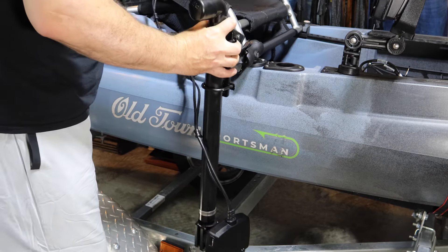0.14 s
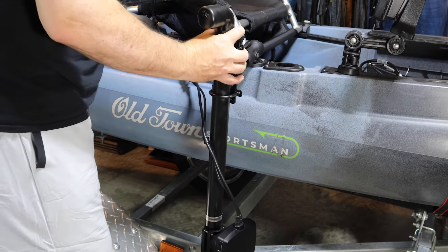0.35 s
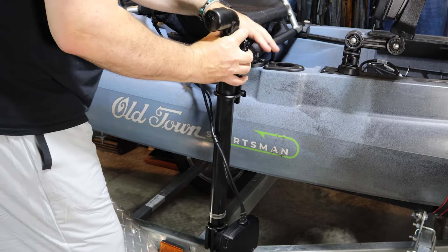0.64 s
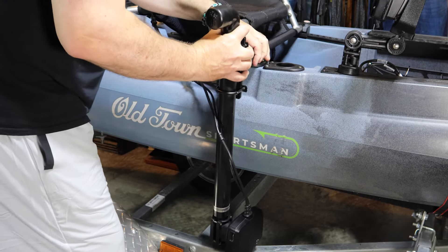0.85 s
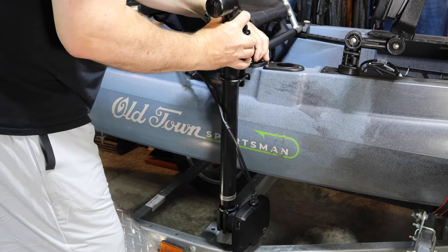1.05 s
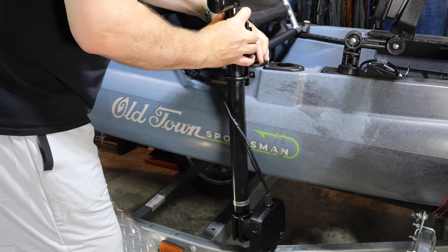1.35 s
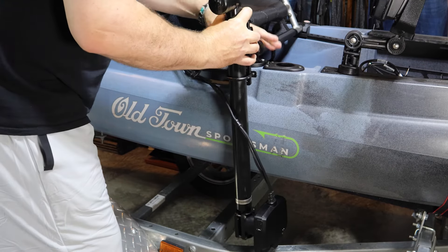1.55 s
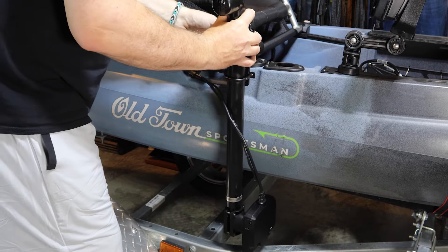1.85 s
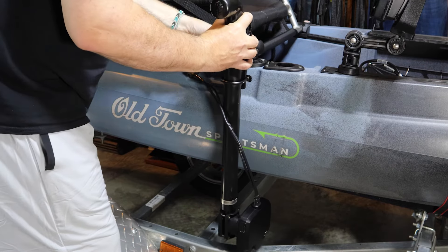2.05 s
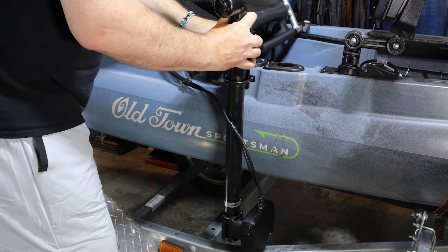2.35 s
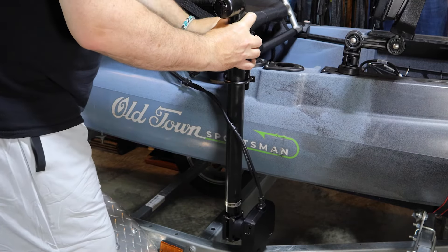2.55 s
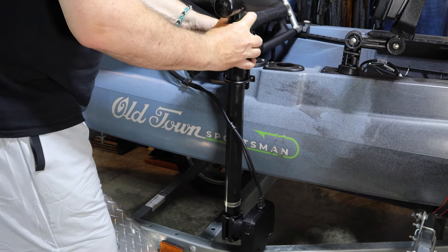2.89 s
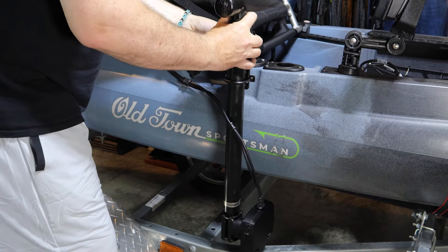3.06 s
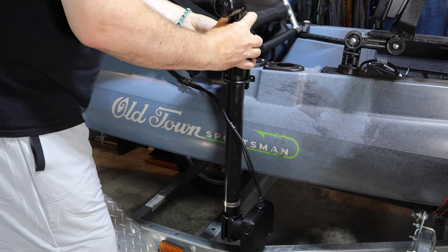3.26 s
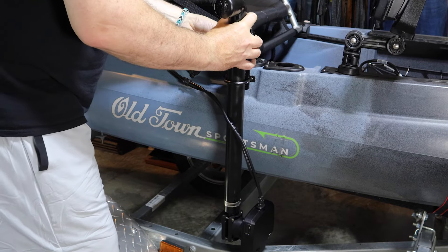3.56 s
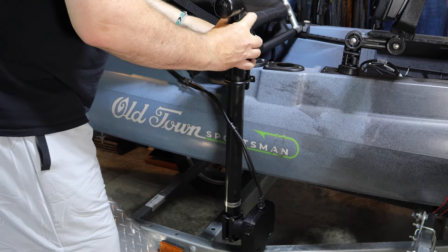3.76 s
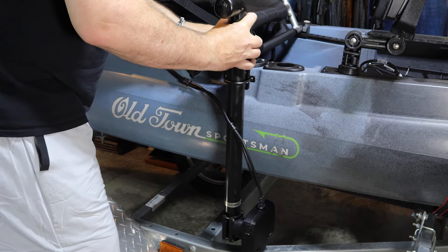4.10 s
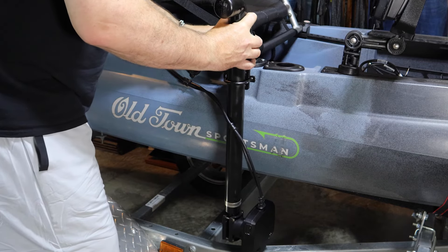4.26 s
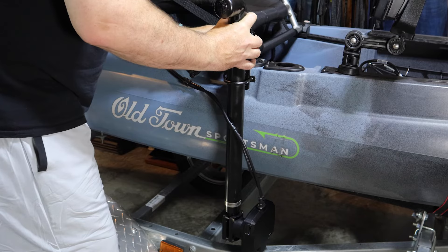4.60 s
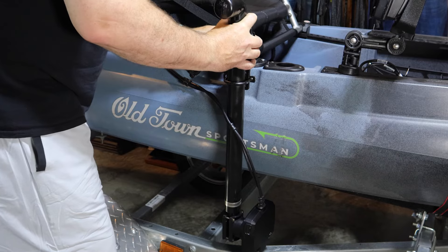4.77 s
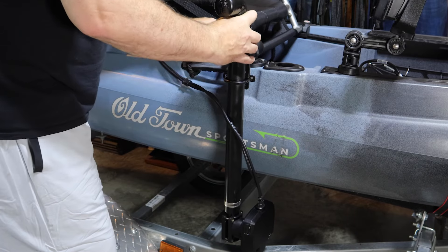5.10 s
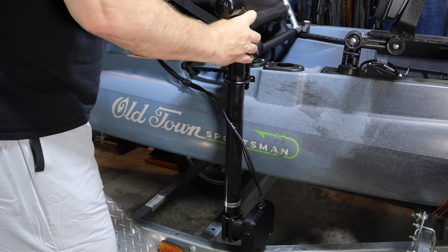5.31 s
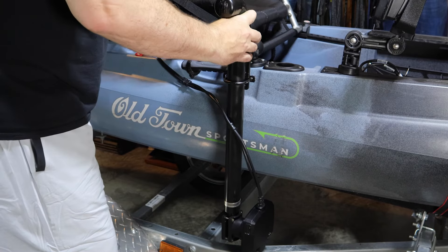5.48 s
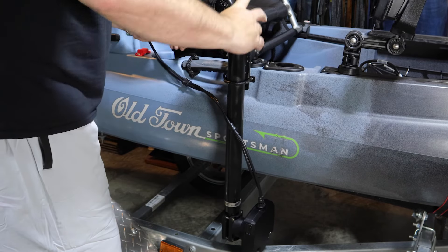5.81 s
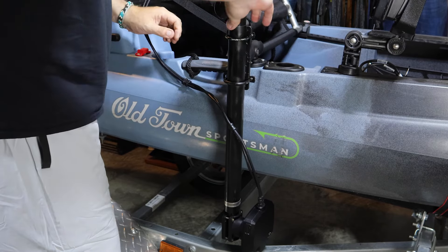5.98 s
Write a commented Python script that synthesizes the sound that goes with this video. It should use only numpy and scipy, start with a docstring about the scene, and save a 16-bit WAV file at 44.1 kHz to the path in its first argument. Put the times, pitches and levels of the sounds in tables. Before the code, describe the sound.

A hollow plastic pole knocks and ticks lightly against a kayak and its mount during the first second or so, each bump ringing softly in the hull. At about 1.4 seconds it scrapes into its seat with a loud clunk and a low boom. Softer, uneven knocks continue to about 3.5 seconds, with a click from a plastic clamp near 2.5 and a sharper one near 3.6, each followed by a faint, thin squeak. Around 4 seconds the clamp gives a brief, wavering squeal, then five loud, sharp clicks in quick succession until 4.6, with short squeaks among them. A few faint knocks follow from 5 to 5.8 seconds. Hands rub faintly over a low, steady background rush. The garage adds a short echo. The sound sits on the left, with only the bass reaching both sides.

```python
"""A plastic clamp snaps tight in sharp clicks, fixing a hollow pole to a kayak in a garage.
First the pole knocks and clunks into its mount, and each blow makes the hull boom. Then the clamp
squeaks under load as its plastic sticks and slips, and clicks each time it slips a notch.
Hands rub faintly, and the close walls add a short echo.
One microphone feeds the left channel; only the bass spreads to both sides."""
import sys
import numpy as np
from scipy import signal
from scipy.fft import rfft, irfft
from scipy.io import wavfile
from scipy.ndimage import uniform_filter1d

SR = 44100
rng = np.random.default_rng(int(sys.argv[2]) if len(sys.argv) > 2 else 0)


def to_wav(s):
    """Save 16-bit WAV."""
    ch = np.atleast_2d(s).T  # columns
    pcm = np.round(np.clip(ch, -1, 1) * 32767)  # PCM
    wavfile.write(sys.argv[1], SR, pcm.astype(np.int16))


N = 270950
SIZE = 8192  # samples in one short sound
HZ = np.arange(SIZE // 2 + 1) * SR / SIZE + 1e-3  # frequencies of a short sound
SCENE_HZ = np.fft.rfftfreq(N, 1 / SR)  # frequencies of a full-length sound
SEATING_S = 1.45  # when the pole lands in its seat


def undb(db):
    """Turn decibels into a gain to multiply by."""
    return 10 ** (np.asarray(db) / 20)


def along(points, hz):
    """Read a value between (frequency, value) points, with octaves evenly spaced."""
    f, value = np.transpose(points)
    return np.interp(np.log(np.maximum(hz, 1)), np.log(f), value)


def noise(colour, samples):
    """Noise of average (rms) strength 1; its colour says how strong each frequency is."""
    gains = undb(along(colour, np.fft.rfftfreq(samples, 1 / SR)))
    x = irfft(rfft(rng.standard_normal(samples)) * gains, samples)
    return x / x.std()


def fade(t, t60):
    """A fade that falls by 60 dB in t60 seconds, the ring time."""
    return np.exp(-np.log(1000) * t / t60)


def burst(t60):
    """The spectrum of a dying puff of noise with energy 1."""
    x = rng.standard_normal(SIZE) * fade(np.arange(SIZE) / SR, t60)
    return rfft(x / np.linalg.norm(x))


def resonance(hz, width_hz, f=HZ):
    """A ringing part passes its own pitch fully and others less."""
    return 1j * f * width_hz / (hz ** 2 - f ** 2 + 1j * f * width_hz)


def damped(modes):
    """Plastic stops ringing fast, so each of its resonances is made at least 500 Hz wide."""
    return sum(undb(db) * resonance(hz, max(width, 500)) for hz, width, db in modes)


def soft(hz):
    """A soft contact passes little above this frequency."""
    return 1 / (1 + (1j * HZ / hz) ** 2 + 1j * HZ / hz)


def bend(spectrum, cycles, knee_hz):
    """Turn a spectrum into a bending wave in plastic: the lows arrive after the highs."""
    return irfft(spectrum * np.exp(-2j * np.pi * cycles * np.log(1 + HZ / knee_hz)))


def loudest(x, db):
    """Scale a sound so that its loudest 4 ms have this level."""
    return x * undb(db) / np.sqrt(uniform_filter1d(x ** 2, size=176).max())


def unsteady(rate_hz):
    """A smooth random wander, mostly between -1 and 1."""
    knots = rng.standard_normal(1000)
    return np.interp(np.arange(N) / SR * rate_hz, np.arange(len(knots)), knots)


def movement(s, length_s, attack_s, release_s):
    """The gain of one movement: it swells, holds and dies away."""
    t = np.arange(N) / SR - s
    return np.clip(t / attack_s, 0, 1) * np.exp(-np.maximum(t - length_s, 0) / release_s)


def add(bus, s, sound, room_db):
    """Put a sound on a bus of two tracks: one is heard directly, one feeds the room."""
    i = max(int(s * SR), 0)
    part = sound[:N - i]
    bus[:, i:i + len(part)] += np.outer([1, undb(room_db)], part)


# the colour of the background noise: (frequency [Hz], relative level [dB])
AIR_COLOUR = [(15, -35), (25, -25.5), (64, 1), (114, -6), (141, -4), (677, -10), (734, -16), (818, -10.5),
              (1100, -16), (1260, -13.5), (1840, -19), (14800, -32.5), (16000, -59)]


def air(level_db=-59):
    """The quiet garage has a steady, low rush."""
    return noise(AIR_COLOUR, N) * undb(level_db)


# how long the garage rings: (frequency [Hz], ring time [s])
ECHO_TIMES = [(80, 0.68), (300, 0.31), (1000, 0.42), (2500, 0.52), (6000, 0.37), (15000, 0.37)]
# the colour of its echo: (frequency [Hz], relative level [dB])
ECHO_COLOUR = [(60, 16), (150, 8.5), (350, -2), (600, -4.5), (900, -11.5), (1300, -7), (2000, -9),
               (2550, 1), (3300, -2), (4500, -8), (6500, -2), (10000, -5.5), (15000, 0.5)]


def garage(x, echo_db=-2, first_s=0.012, build_s=0.00067):
    """Sound bounces between close walls, and each band of pitches dies at its own pace."""
    t = np.arange(SR) / SR
    f = np.fft.rfftfreq(SR, 1 / SR)
    reflections = rfft(rng.standard_normal(SR)) * undb(along(ECHO_COLOUR, f))
    onset = 1 - np.exp(-np.maximum(t - first_s, 0) / build_s)
    edges = np.geomspace(20, SR / 2, 16)
    tail = 0
    for lo, hi in zip(edges, edges[1:]):
        decay = onset * fade(t, along(ECHO_TIMES, np.sqrt(lo * hi)))
        band = irfft(reflections * (f >= lo) * (f < hi), SR)
        tail = tail + band * decay / np.linalg.norm(decay)
    return undb(echo_db) * signal.fftconvolve(x, tail)[:N]


# the hands shift the pole and its cable: (time [s], length [s], level [dB])
HAND_MOVES = [(0, 0.34, -57.5), (0.98, 0.71, -59.5), (2.071, 0.034, -57), (2.465, 0.34, -60),
              (3.08, 0.48, -67), (3.58, 1.12, -58.5), (5.077, 0.19, -61.5), (5.507, 0.54, -62)]


def effort(resting_db=-73.5, attack_s=0.0083, release_s=0.058):
    """How strongly the hands rub, as a gain; every move swells and fades alike."""
    moves = sum(undb(db) * movement(s, length, attack_s, release_s) for s, length, db in HAND_MOVES)
    return undb(resting_db) + moves


# the colour of the rubbing: (frequency [Hz], relative level [dB])
RUB_COLOUR = [(40, -26), (90, -7), (200, 1), (350, 3.5), (800, -4.5), (1600, -9.5), (3000, -19),
              (5000, -18), (12000, -34)]


def rubbing(slips_per_s=900, grain_db=3, grip_db=3):
    """Tiny uneven slips under the hands blur into a shuffle."""
    slips = (rng.random(N) < slips_per_s / SR) * rng.standard_normal(N)
    slips *= undb(grain_db * np.minimum(rng.exponential(size=N), 2))
    slips *= undb(grip_db * unsteady(45))
    shuffle = irfft(rfft(slips) * undb(along(RUB_COLOUR, SCENE_HZ)), N)
    return shuffle / shuffle.std() * effort()


def thread(start_s=3.4, length_s=0.56, hz=1610, start_db=-65, rise_db=9, halting_db=4):
    """The clamp's screw thread sings a faint, halting note, louder as it tightens."""
    note = irfft(rfft(rng.standard_normal(N)) * resonance(hz, 140, SCENE_HZ) ** 2, N)
    note *= undb(halting_db * unsteady(35))
    tightness = np.clip((np.arange(N) / SR - start_s) / length_s, 0, 1)
    turning = movement(start_s, length_s, attack_s=0.0055, release_s=0.046)
    return note / note.std() * undb(start_db + rise_db * tightness) * turning


# cable and fingers touch the shell: (time [s], level [dB])
LIGHT_TOUCHES = [(0.018, -55), (0.091, -56.5), (0.104, -58), (0.25, -47), (0.262, -46.5), (2.194, -65),
                 (3.06, -52.5), (5.124, -53.5), (5.771, -56.5)]


def ticks(hz=5500, width_hz=6000):
    """A light, hard touch gives a bright tick with no body."""
    bus = np.zeros((2, N))
    for s, db in LIGHT_TOUCHES:
        tick = irfft(burst(t60=0.022) * resonance(hz, width_hz) ** 2)
        add(bus, s, loudest(tick, db), room_db=-2)
    return bus


# the strong notes of the hull panels: (pitch [Hz], relative level [dB], ring time [s])
HULL_NOTES = [(60, -7, .25), (95, 0, .24), (130, -5, .2), (165, -7, .18), (207, -1, .26), (255, -10, .18),
              (305, -3, .2), (345, 3, .3), (400, -1, .22), (440, 0, .25), (522, -6, .3), (592, -5, .3),
              (678, -7, .28), (852, -8, .28), (940, -8, .23)]
# the many weaker notes, blurred into a wash: (frequency [Hz], relative level [dB])
WASH_COLOUR = [(35, -39), (70, -40), (130, 7), (240, 5.5), (380, 7.5), (550, -7.5), (900, -9.5),
               (1500, -13.5), (2600, -39)]


def boom(rise_s, wash_db, wash_t60):
    """The hull swells and rings, its notes a little out of tune in a new way with each blow."""
    t = np.arange(2 * SIZE) / SR
    hz, db, t60 = np.transpose(HULL_NOTES)[:, :, None]
    detune, phase = rng.standard_normal((2, len(HULL_NOTES), 1))
    pitch = hz * (1 + 0.0097 * detune)
    rings = undb(db) * fade(t, t60) * np.sin(2 * np.pi * (pitch * t + phase))
    wash = undb(wash_db) * noise(WASH_COLOUR, len(t)) * fade(t, wash_t60)
    return (rings.sum(axis=0) + wash) * (1 - np.exp(-t / rise_s))


def heave(level_db=-30.5, hz=91, sway_hz=58, sway_db=-7, rise_s=0.0089):
    """Under the full weight of the pole, the hull swings at its two deepest notes."""
    t = np.arange(2 * SIZE) / SR
    swing = np.sin(2 * np.pi * hz * t) + undb(sway_db) * np.sin(2 * np.pi * sway_hz * t)
    swing *= (1 - np.exp(-t / rise_s)) * fade(t, t60=0.27)
    bus = np.zeros((2, N))
    add(bus, SEATING_S, loudest(swing, level_db), room_db=-30)
    return bus


def chatter(gain_db=-36, hz=1000, width_hz=800, contacts_per_s=700, lead_s=0.037, grain_db=4):
    """The pole scrapes down into its seat and chatters there until it settles."""
    contacts = (rng.random(N) < contacts_per_s / SR) * undb(grain_db * rng.standard_normal(N))
    scrape = irfft(rfft(contacts) * resonance(hz, width_hz, SCENE_HZ) ** 2, N)
    settling = movement(SEATING_S - lead_s, 0.0069, attack_s=0.024, release_s=0.085)
    bus = np.zeros((2, N))
    add(bus, 0, scrape / scrape.std() * undb(gain_db) * settling, room_db=-2)
    return bus


def jiggles(count=12, scatter_db=2, hz=750, hardness_db=-3, hull_db=-7):
    """Extra rows for POLE_KNOCKS: faint chance knocks of the loose pole, louder with busy hands."""
    at = ((np.arange(count) + rng.random(count)) / count * N).astype(int)
    levels = 20 * np.log10(effort()[at]) + scatter_db * rng.standard_normal(count)
    return [(i / SR, db, hz, hardness_db, hull_db) for i, db in zip(at, levels)]


# the pole hits mount and hull; hardness and boom adjust the base level for their parts of the sound:
# (time [s], base level [dB], pitch [Hz], hardness [dB], hull boom [dB])
POLE_KNOCKS = [(0.017, -56, 980, 12, 4), (0.175, -39, 624, -2.5, 0), (0.244, -58.5, 600, 8.5, 7),
               (0.286, -41, 650, -4, -14), (0.85, -41.5, 1000, 2, 3.5), (0.892, -42.5, 744, -0.5, 7),
               (0.933, -35.5, 640, -9, 3.5), (0.966, -47, 635, -11, 13), (1.154, -38.5, 690, -2, 5),
               (1.417, -38, 940, -4, -7), (1.425, -24, 880, -15, 0.5), (1.435, -19.5, 595, -14, -1),
               (1.468, -48, 794, -13, 14), (1.595, -48.5, 586, -4, 8), (1.66, -43.5, 550, -5.5, 3),
               (2.121, -54, 680, -17, 9), (2.19, -41.5, 674, -3.5, -23), (2.472, -50, 850, -27, -2.5),
               (2.524, -48.5, 654, -14, 3.5), (2.625, -38.5, 670, -21, -11), (2.754, -55.5, 826, 3, -7),
               (2.782, -44.5, 685, -5.5, -1.5), (2.841, -44, 870, -6.5, -12), (3.009, -45.5, 590, -19, 4),
               (3.064, -47.5, 815, -6, -2), (3.16, -49.5, 870, -9, -6.5), (3.267, -49.5, 715, -7, 5),
               (3.324, -44, 700, -28, -18), (3.446, -49.5, 725, -6, 2), (5.065, -49, 860, -1, -10),
               (5.084, -43.5, 890, -4, -1.5), (5.199, -55, 634, 2.5, 5.5), (5.324, -47, 740, -1.5, -2),
               (5.484, -52, 613, -11, 3.5), (5.635, -44.5, 490, -20, 3.5)]


def knocks(clack_hz=1650, thud_hz=430, room_db=1):
    """A blow clacks through the pole, rattles the mount, thuds into the deck and wakes the hull."""
    bus = np.zeros((2, N))
    for s, db, hz, hard_db, hull_db in POLE_KNOCKS + jiggles():
        # 1 + burst is one clean hit plus its rattle
        clack = irfft(resonance(clack_hz, 1350) ** 2 * soft(1790) ** 2 * (1 + burst(0.046)))
        knock = resonance(hz, 0.98 * hz) ** 2 * soft(1.45 * hz) ** 2 * (1 + burst(0.049))
        knock = bend(knock, cycles=1.235, knee_hz=153.6)
        thud = resonance(thud_hz, 450) ** 2 * soft(490) ** 2 * (1 + burst(0.07))
        thud = bend(thud, cycles=1.626, knee_hz=118.2)
        tick = irfft(burst(0.034) * resonance(4240, 1400) * resonance(5500, 9100))
        hull = boom(rise_s=0.0044, wash_db=3.5, wash_t60=0.46)
        add(bus, s, loudest(clack, db + hard_db + 2), room_db)
        add(bus, s, loudest(tick, db + 0.92 * hard_db - 13), room_db)  # hard contacts tick more
        add(bus, s, loudest(knock, db + 3), room_db)
        add(bus, s, loudest(thud, db + hull_db - 1), room_db - 2.5)
        add(bus, s + 0.00618, loudest(hull, db + hull_db - 2.5), room_db=-14)
    return bus


def stick_slip(hz, gain, second_db=-19, third_db=-32, waver=0.012, rough_db=3):
    """Plastic sticks and slips at an unsteady rate and with uneven force, making a rough tone."""
    pace, force = uniform_filter1d(rng.standard_normal((2, SIZE)), size=100)[:, :len(hz)] * 10
    pitch = hz * (1 + waver * pace)
    phase = 2 * np.pi * np.cumsum(pitch) / SR
    overtones = undb(second_db) * np.sin(2 * phase) + undb(third_db) * np.sin(3 * phase)
    edge_db = along([(1000, 8), (1400, -3), (5000, 7), (6200, -10)], pitch)  # how jerky the slip is
    tone = np.sin(phase) + undb(edge_db) * overtones
    return np.sqrt(2) * tone * gain * undb(rough_db * force)


# the clamp's short squeaks: (time [s], length [s], first pitch [Hz], last pitch [Hz], level [dB])
CLAMP_SQUEAKS = [(0.1, 0.0062, 2490, 3120, -50.5), (2.238, 0.011, 2030, 1890, -59),
                 (2.63, 0.03, 6670, 5700, -44), (3.406, 0.012, 1610, 1600, -50.5),
                 (3.728, 0.048, 5180, 3910, -43.5), (3.838, 0.022, 4050, 3760, -54),
                 (3.998, 0.026, 1247, 1870, -36), (4.334, 0.0167, 1376, 810, -27.5),
                 (4.442, 0.021, 1723, 930, -28.5), (4.604, 0.019, 1494, 980, -30.5)]


def squeaks(room_db=-2, ring_hz=5000, ring_db=6):
    """Each squeak swells and fades while its pitch glides ever faster."""
    bus = np.zeros((2, N))
    for s, length, first_hz, last_hz, db in CLAMP_SQUEAKS:
        progress = np.linspace(0, 1, int(length * SR))
        pitch = first_hz + (last_hz - first_hz) * progress ** 1.8
        swell = np.abs(np.sin(np.pi * progress ** 0.87)) ** 0.7
        # a squeak carries further near the pitch at which the clamp's edge rings
        carry_db = room_db + ring_db * abs(resonance(ring_hz, 400, first_hz))
        add(bus, s, stick_slip(pitch, undb(db) * swell), carry_db)
    return bus


# points along one longer squeal: (time [s], pitch [Hz], level [dB])
SQUEAL_PATH = [(4.026, 1334, -48), (4.035, 1043, -38), (4.042, 985, -31.5), (4.05, 1212, -28),
               (4.056, 1483, -32), (4.077, 1360, -27.5), (4.086, 1520, -35), (4.093, 1277, -25),
               (4.101, 970, -38)]


def squeal():
    """Just before the clamp gives way, it squeals and wavers with the load."""
    s, hz, db = np.transpose(SQUEAL_PATH)
    t = np.arange(s[0], s[-1], 1 / SR)
    bus = np.zeros((2, N))
    add(bus, s[0], stick_slip(np.interp(t, s, hz), undb(np.interp(t, s, db))), room_db=-2)
    return bus


# how the clamp's body and hard edges ring: (pitch [Hz], width before damping [Hz], relative level [dB])
BODY_NOTES = [(1050, 1270, 35.5), (1760, 240, 31), (2410, 360, -24)]
EDGE_NOTES = [(3840, 7200, -2.5), (5080, 310, 12.5), (6070, 270, -2), (9900, 730, -2)]
# the clamp slips a notch; boom and sizzle adjust the base level for their parts of the sound:
# (time [s], base level [dB], flexing pitch [Hz], hull boom [dB], sizzle [dB])
CLAMP_SLIPS = [(2.55, -28, 1390, -4.5, -33), (3.632, -21.5, 1720, -12.5, -11),
               (4.114, -25, 1210, -23.5, -26), (4.212, -18.5, 1200, -21.5, -25),
               (4.31, -18, 1180, -21, -24), (4.432, -17.5, 1170, -19, -29),
               (4.575, -15.5, 1270, -15.5, -25)]


def clicks(crack_hz=3800, hollow_hz=3150, rebound_s=0.000979):
    """With each slip the hard edges snap, then the clamp flexes twice, a millisecond apart."""
    bus = np.zeros((2, N))
    hollow = 1 - resonance(hollow_hz, 400)  # a quiet gap between the notes of body and edges
    body = damped(BODY_NOTES) * hollow * soft(2500)
    edges = damped(EDGE_NOTES) * hollow * resonance(3100, 3500) * resonance(6900, 8000)
    rebound = 0.94 * np.exp(-2j * np.pi * HZ * rebound_s)  # the second flex, a delayed copy
    strongest_db = max(row[1] for row in CLAMP_SLIPS)
    for s, db, hz, hull_db, sizzle_db in CLAMP_SLIPS:
        room_db = 3.5 + 0.21 * hull_db  # the more the hull takes part, the more reaches the room
        tick_db = -17.5 + 0.5 * (db - strongest_db)  # weak slips are duller
        flex = body * resonance(hz, 1340) * (1 + rebound + burst(0.058))
        flex = bend(flex, cycles=1.117, knee_hz=155.6)
        snap = bend(edges * (1 + 1.5 * burst(0.037)), cycles=1.214, knee_hz=323)
        sizzle = irfft(resonance(7850, 1200) ** 2 * burst(0.034))
        tick = irfft(resonance(14500, 3800) ** 2 * (1 + burst(0.008)))
        crack = irfft(resonance(crack_hz, 1500) ** 2 * burst(0.054))
        hull = boom(rise_s=0.00091, wash_db=12.5, wash_t60=0.2)
        add(bus, s, loudest(snap, db - 8.5), room_db)
        add(bus, s, loudest(sizzle, db + sizzle_db + 2), room_db)
        add(bus, s + 0.00037, loudest(crack, db - 17), room_db - 1)
        add(bus, s + 0.00045, loudest(flex, db + 5), room_db)
        add(bus, s + 0.0005, loudest(tick, db + tick_db), room_db=-9)
        add(bus, s + 0.00426, loudest(hull, db + hull_db + 3.5), room_db=-14)
    return bus


def scene():
    """Everything reaches one microphone on the left channel."""
    pole = knocks() + heave() + chatter() + ticks()
    clamp = clicks() + squeaks() + squeal()
    direct, to_room = pole + clamp + rubbing() + thread()
    microphone = direct + garage(to_room) + air()
    return np.array([microphone, np.zeros(N)])


def record(dry, wind_cut_hz=185, hiss_db=-66.5, top_hz=16200):
    """A wind filter spreads the bass to both sides; each input hisses; the highest treble is cut."""
    mid = (dry[0] + dry[1]) / 2  # what left and right share
    side = (dry[0] - dry[1]) / 2  # what sets them apart
    b, a = signal.butter(1, wind_cut_hz, "high", fs=SR)
    side = signal.lfilter(b, a, signal.lfilter(b, a, side))
    hiss = undb(hiss_db) * rng.standard_normal((2, N))
    treble_cut = signal.ellip(10, 0.2, 70, top_hz, fs=SR, output="sos")
    return signal.sosfilt(treble_cut, np.array([mid + side, mid - side]) + hiss)


dry = scene()
out = record(dry)
to_wav(out)
```